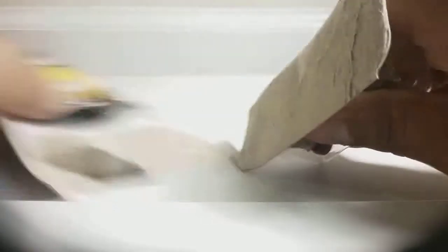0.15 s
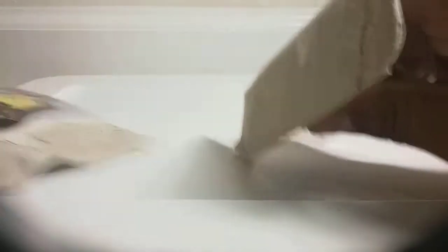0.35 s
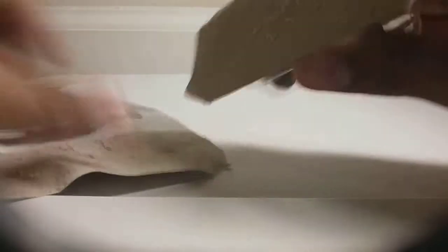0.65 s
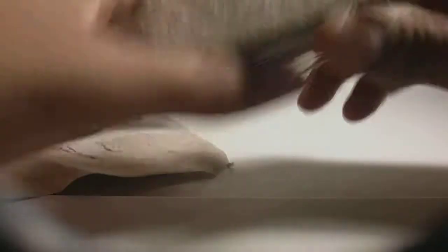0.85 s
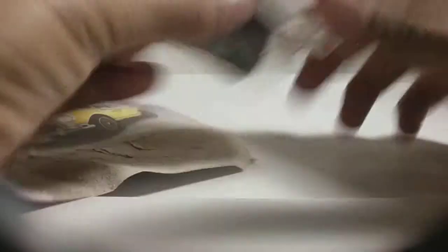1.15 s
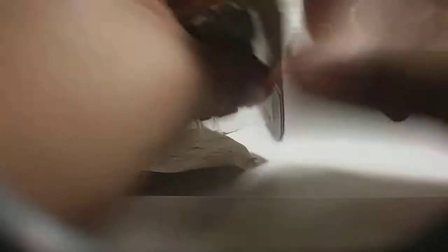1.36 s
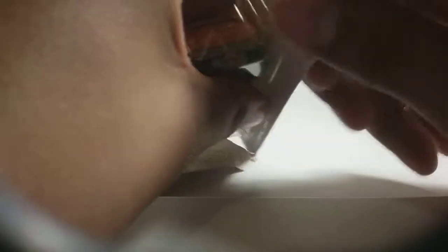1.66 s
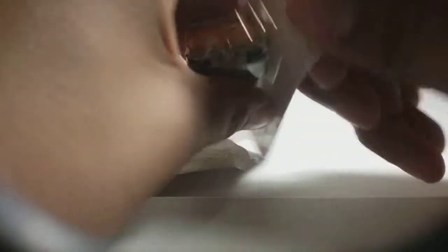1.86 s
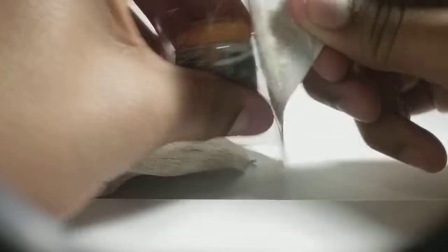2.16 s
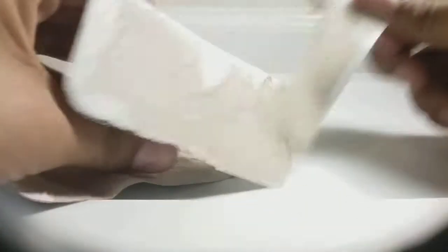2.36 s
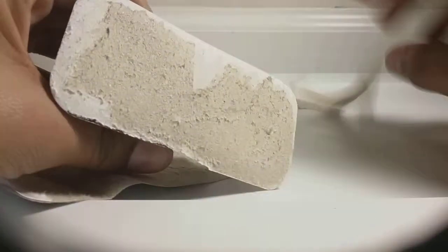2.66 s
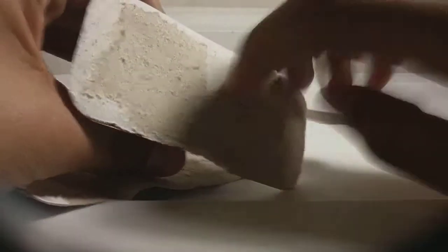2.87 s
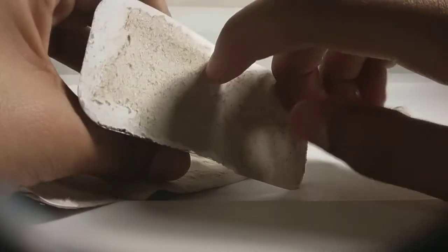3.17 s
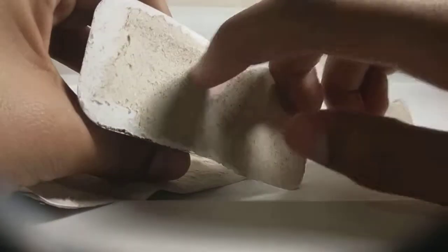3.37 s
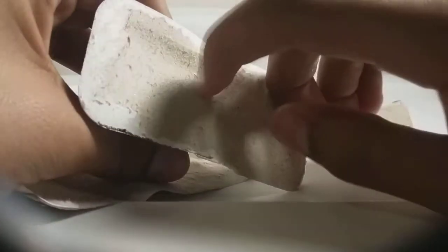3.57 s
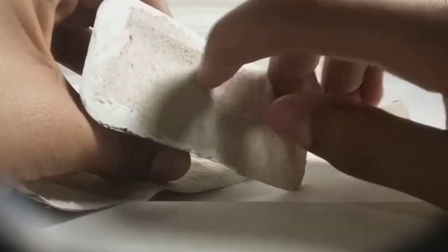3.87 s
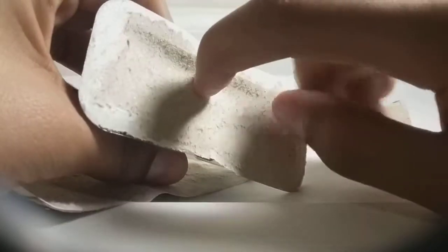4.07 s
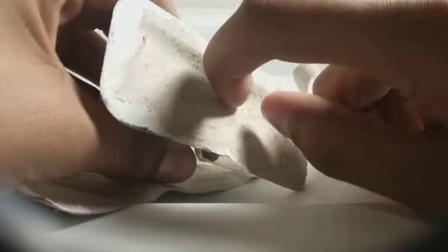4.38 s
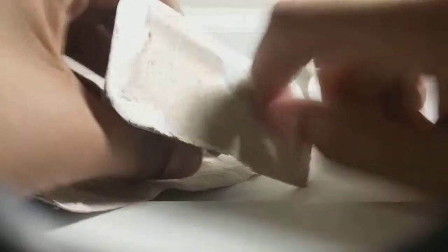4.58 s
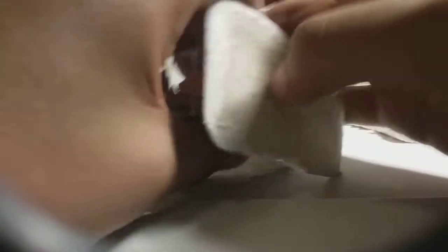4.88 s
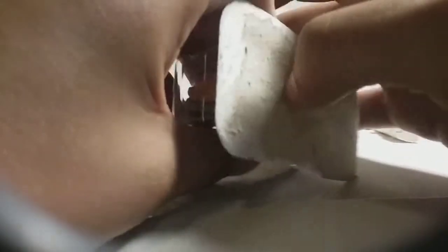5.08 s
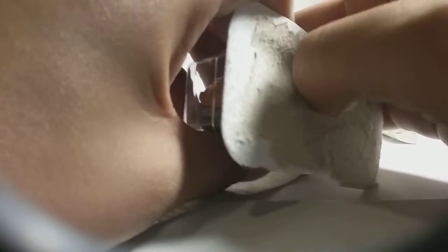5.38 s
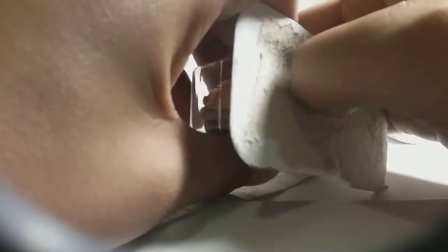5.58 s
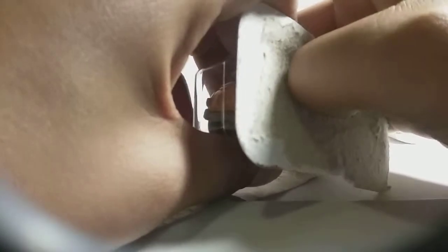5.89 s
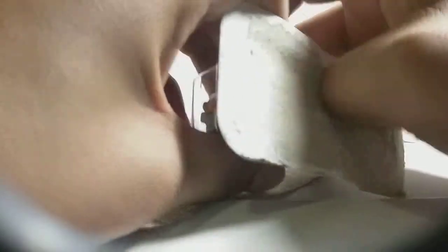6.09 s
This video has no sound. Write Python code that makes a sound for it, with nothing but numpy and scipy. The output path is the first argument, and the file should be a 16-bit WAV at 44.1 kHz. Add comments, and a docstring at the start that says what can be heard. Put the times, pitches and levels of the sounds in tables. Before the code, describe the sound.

A bright, dry cardboard rip starts at once, mixed with plastic crinkle and soft table knocks. It thins to small clicks and a near lull, rips again briefly, then settles into faint handling, scrapes and a few hard snaps. Denser crackles and boxy pops finish it. Close small microphone, short indoor echo, faint hum and hiss.

```python
"""In a quiet, humming room with a wall behind the table, hands tear the card back off a plastic pack.
Random clicks are the breaking fibres of two long tears and of a fingernail's scrapes and pulls.
Short bursts and single pulses are snaps; resonances make the card boom and the plastic bubble crinkle.
Soft pushes make the table thud; one wall echo and a short tail answer, and a small microphone colours
the pack, the knocks and the echo."""
import sys
import numpy as np
from scipy import signal
from scipy.fft import rfft, irfft
from scipy.io import wavfile

SR = 44100
rng = np.random.default_rng(int(sys.argv[2]) if len(sys.argv) > 2 else 0)


def transcribe(signal):
    """Save signal, clipped to [-1, 1], as a 16-bit WAV file at the path in sys.argv[1]."""
    frames = np.atleast_2d(signal).T
    limited = np.clip(frames, -1, 1)
    pcm = np.round(limited * 32767).astype(np.int16)
    wavfile.write(sys.argv[1], SR, pcm)


N = 274743


def from_db(db):
    """Turn decibels into a plain gain."""
    return 10 ** (np.asarray(db) / 20)


def rms_one(x):
    """Scale a sound to an average (rms) strength of 1."""
    return x / np.sqrt(np.mean(x ** 2) + 1e-20)


def gains_in_time(rows):
    """Join the dB levels with straight lines and give gains per sample, all but silent outside the rows."""
    times, *columns = np.transpose(rows)
    now = np.arange(N) / SR
    return np.array([from_db(np.interp(now, times, levels, left=-200, right=-200)) for levels in columns])


def drift(rate_hz):
    """Slow random wandering with spread 1: smoothed noise, worked out every 40 samples."""
    r = np.exp(-2 * np.pi * rate_hz * 40 / SR)
    noise = rng.standard_normal(N // 40 + 2002)
    slow = rms_one(signal.lfilter([1], [1, -2 * r, r * r], noise)[2000:])   # skip the settling start
    return np.interp(np.arange(N) / 40, np.arange(len(slow)), slow)


def resonate(x, hz, width_hz):
    """Ring at one pitch, with gain 1 at the peak; a narrower resonance rings longer."""
    r = np.exp(-np.pi * width_hz / SR)
    top = np.array([1, 0, -1]) * (1 - r * r) / 2
    return signal.lfilter(top, [1, -2 * r * np.cos(2 * np.pi * hz / SR), r * r], x)


def cut(x, hz, kind, order=2):
    """Keep only what lies above ("high") or below ("low") a pitch."""
    return signal.sosfilt(signal.butter(order, hz, kind, fs=SR, output="sos"), x)


# tone of the room's hum and hiss: (frequency [Hz], relative level [dB])
AIR_TONE = [(24, -27.5), (40, -0.5), (60, 9.5), (124, 8.5), (444, -6.5), (965, -10), (1340, -8),
            (4570, -16), (6490, -17), (8550, -24), (14100, -18.5), (16000, -25)]
AIR_DB = -68.5   # level around which it wavers


def air():
    """Hum of the room and hiss of the electronics: tinted noise with a wavering level."""
    hz = np.fft.rfftfreq(N, 1 / SR) + 1
    tone_hz, tone_db = np.transpose(AIR_TONE)
    tint = from_db(np.interp(np.log(hz), np.log(tone_hz), tone_db))
    noise = irfft(rfft(rng.standard_normal(N)) * tint, N)
    level = from_db(AIR_DB + 0.72 * drift(9.1))
    return level * rms_one(cut(noise, 35, "high", order=4))


HUM_HZ, HUM_DB = 119, -76


def hum():
    """A low, wavering hum: noise through two equal narrow resonances."""
    once = resonate(rng.standard_normal(N), HUM_HZ, 25)
    return from_db(HUM_DB) * rms_one(resonate(once, HUM_HZ, 25))


TAIL_DB, TAIL_T60_S, WALL_CUT_HZ = -14, 0.16, 6400   # tail level before the wall dulls it
ECHO_S, ECHO_DB, ECHO_HZ, ECHO_WIDTH_HZ = 0.0135, -11.5, 1100, 200   # echo level before it resonates


def room(x):
    """One hollow echo from the wall behind the table, and a dull noise tail that dies away."""
    t = np.arange(SR // 3) / SR
    tail = rng.standard_normal(len(t)) * from_db(-60 * t / TAIL_T60_S) * np.clip(t / 0.023, 0, 1)
    answer = cut(from_db(TAIL_DB) * tail / np.linalg.norm(tail), WALL_CUT_HZ, "low", order=1)
    click = from_db(ECHO_DB) * (np.arange(len(t)) == round(ECHO_S * SR))
    answer += resonate(click, ECHO_HZ, ECHO_WIDTH_HZ)
    return signal.fftconvolve(x, answer)[:N]


# resonances of the microphone's port: (frequency [Hz], width [Hz], boost [dB])
PORT_RESONANCES = [(6090, 1200, 7.5), (6632, 640, 9)]
DULL_ABOVE_HZ, TOP_DB = 7220, -11


def microphone(x):
    """The small port rings near its own pitches and is dull above; the bass is thin."""
    for hz, width_hz, db in PORT_RESONANCES:
        x = x + (from_db(db) - 1) * resonate(x, hz, width_hz)
    top = from_db(TOP_DB) * cut(x, DULL_ABOVE_HZ, "high", order=4)
    x = cut(x, DULL_ABOVE_HZ, "low", order=4) + top
    return cut(x, 61, "high", order=3)


# knocks of the pack on the table and in the palm: (time [s], relative push level [dB])
KNOCKS = [(0.07, -30), (0.23, -27), (0.914, -46), (1.521, -33), (1.606, -41), (1.641, -43.5), (1.958, -52),
          (1.994, -39), (2.209, -34), (2.285, -28.5), (2.342, -26), (2.451, -33), (2.778, -46),
          (2.829, -39), (2.942, -33.5), (3.013, -41.5), (3.422, -44.5), (3.574, -51), (3.643, -33.5),
          (3.662, -32.5), (3.723, -43), (4.15, -42), (4.299, -27.5), (4.316, -38), (4.354, -37.5),
          (4.399, -45), (4.593, -31.5), (4.612, -27), (4.645, -29), (4.696, -34), (4.892, -47),
          (5.132, -44.5), (5.239, -43), (5.4, -39), (5.459, -36), (5.584, -35.5), (5.627, -34),
          (5.668, -34), (5.732, -34.5), (5.751, -34), (5.984, -33.5), (5.999, -42), (6.104, -29),
          (6.128, -33), (6.175, -30)]
SHAKES_PER_S, TEAR_SHAKE_DB, SCRAPE_SHAKE_DB = 70, -4.5, -11


def knocks():
    """Single pushes, and uneven shakes that follow tears and scrapes, set the table top thudding."""
    pushes = np.full(N, 1e-18)
    for s, db in KNOCKS:
        pushes[round(s * SR)] += from_db(db)
    effort = from_db(TEAR_SHAKE_DB) * tear_effort()[1]
    for s, db, *_, length_s in SCRAPES:
        drag = scrape_shape(length_s)[0]
        effort[round(s * SR):][:len(drag)] += from_db(db + SCRAPE_SHAKE_DB) * drag
    # one shake at a chance moment in each equal slot of time
    count = N // SR * SHAKES_PER_S
    moments = ((np.arange(count) + rng.random(count)) * SR / SHAKES_PER_S).astype(int)
    pushes[moments] += effort[moments] * rng.normal(0, 1, count)
    thud = resonate(pushes, 140, 82) + 0.16 * resonate(pushes, 280, 110)
    return from_db(40) * cut(thud, 450, "low", order=4)


# the pack's changing colour as it is turned about:
# (time [s], sizzle against crackle, before the mix [dB], bubble pitch [Hz])
COLOUR = [(0.0, -8, 3200), (0.45, -5, 4200), (0.9, -11, 3980), (1.06, -27, 4700), (1.14, -5, 4330),
          (1.3, -18.5, 3700), (1.55, -9, 2640), (1.649, -15, 2680), (1.7, 17, 2900), (1.76, -14, 2700),
          (1.96, -13, 2440), (2.1, -3, 4000), (2.46, -10.5, 2700), (2.65, -2.5, 4700), (2.92, -10, 2600),
          (3.1, -9.5, 3400), (3.64, -10.5, 2900), (4.3, -9.5, 3710), (4.6, -9.5, 2750), (4.75, -10, 4000),
          (5.2, -14.5, 2380), (5.45, -17.5, 2600), (5.6, -5, 2900), (5.629, -2, 2900), (5.75, -22, 2860),
          (5.98, -10.5, 3150), (6.085, -7, 3700), (6.11, -9.5, 2670), (6.23, -9, 3400)]


def colour_at(s):
    """Turning the pack changes its sizzle level in dB and its bubble pitch in Hz."""
    times, sizzle_db, bubble_hz = np.transpose(COLOUR)
    return np.interp(s, times, sizzle_db), np.interp(s, times, bubble_hz)


# resonances of card and bubble: (frequency [Hz], width of one pass [Hz], relative level [dB])
# the level serves tears and handling only
CARD = [(180, 45, 1), (308, 44, 6), (463.3, 390, 5.5), (590, 270, 3.5), (750, 170, -5.5), (930, 576, 4),
        (1100, 350, -2.5), (1558, 340, -11.5), (1526, 720, 2.5), (1870, 840, -22), (2459, 330, -3),
        (2900, 830, -5.5), (3718, 580, -5.5), (3860, 1400, -7), (4700, 890, -18.5)]


def card(fine, coarse, direct, rings):
    """Fine clicks are heard directly as crackle and sizzle, coarse ones through the pack's resonances."""
    crackle = cut(cut(direct[0] * fine, 6100, "high"), 6750, "low", order=4)
    sizzle = cut(direct[1] * fine, 11460, "high", order=4)
    out = crackle + sizzle
    for k, (gain, (hz, width_hz, _)) in enumerate(zip(rings, CARD)):
        once = resonate(gain * coarse[k % 2], hz, width_hz)   # neighbours take turns with two click streams
        out += resonate(once, hz, 1.7 * width_hz)
    return out


def near(hz, chance_db):
    """Share of a stroke that each resonance takes: most for those close to the stroke's pitch."""
    card_hz, width_hz, _ = np.transpose(CARD)
    share = from_db(chance_db - 12.3 * np.abs(np.log2(card_hz / hz)))
    # narrow resonances pass less of a click but ring longer
    return share / np.linalg.norm(share) * np.sqrt(250 / width_hz)


def strokes(events, shape, crackle_db, sizzle_db, boom_db, crinkle_db):
    """Each stroke's effort drives crackle, sizzle and resonances; the card rings low, the bubble high."""
    direct = np.full((2, N), 1e-18)
    rings = np.full((len(CARD), N), 1e-18)
    luck_db = rng.normal(0, 2.2, (len(events), len(CARD)))
    for (s, db, boom, boom_hz, crinkle, *length), chance_db in zip(events, luck_db):
        at = max(round(s * SR), 0)
        sizzle, crinkle_hz = colour_at(s)
        effort, push = from_db(db) * shape(*length)[:, :N - at]
        boom_shares = from_db(boom_db + boom) * near(boom_hz, chance_db)
        crinkle_shares = from_db(crinkle_db + crinkle) * near(crinkle_hz, chance_db)
        direct_gains = from_db([crackle_db, sizzle_db + sizzle])
        direct[:, at:at + len(effort)] += np.outer(direct_gains, effort)
        rings[:, at:at + len(push)] += np.outer(boom_shares + crinkle_shares, push)
    return direct, rings


# In all tables below, levels are relative: later mix gains and resonances change them.
# fingers shifting on the pack: (time [s], crackle level [dB], card boom level [dB])
HANDLING = [(0.4, -66, -62.5), (0.56, -54, -59), (0.87, -62.5, -72.5), (1.21, -62, -67.5), (1.36, -72, -80),
            (1.88, -75, -68.5), (2.0, -57.5, -63), (2.64, -62, -77), (3.0, -61, -57.5), (3.19, -80, -88.5),
            (3.47, -82, -80), (3.6, -67.5, -72.5), (4.22, -70, -72.5), (4.6, -79, -72),
            (4.77, -55.5, -56.5), (5.0, -61, -51.5), (5.19, -62, -64), (5.32, -52.5, -55),
            (5.6, -61.5, -63), (5.74, -49, -62), (5.83, -62, -99), (6.03, -78.5, -81), (6.1, -51.5, -54.5),
            (6.23, -47, -36)]


def tears_and_handling():
    """Tearing and shifting fingers drive the pack while a changing grip makes resonances come and go."""
    crackle, boom = gains_in_time(HANDLING) + tear_effort()
    sizzle = crackle * from_db(colour_at(np.arange(N) / SR)[0])
    direct = from_db([[-4], [9]]) * np.array([crackle, sizzle])
    rings = []
    for hz, _, db in CARD:
        # low resonances follow the boom, high ones the crackle
        drive = from_db(5.0) * boom if hz < 2200 else from_db(3.0) * crackle
        rings.append(from_db(db + 2.9 * drift(17)) * drive)
    return direct, np.array(rings)


# two long tears, each a list of (time [s], crackle level [dB], card boom level [dB])
TEARS = [
    [(0.0, -26.5, -31), (0.022, -21.5, -35.5), (0.082, -25.5, -35.5), (0.12, -25, -32), (0.208, -20, -35),
     (0.232, -29, -30.5), (0.278, -21.5, -32), (0.388, -45.5, -50), (0.5, -45, -84)],
    [(2.03, -45.5, -50), (2.09, -55, -72.5), (2.246, -25, -32.5), (2.29, -32, -34), (2.344, -24.5, -28),
     (2.394, -28.5, -33.5), (2.468, -26, -31), (2.49, -42.5, -51), (2.56, -64, -74)],
]


def tear_effort():
    """Crackle and boom effort of both tears, rising and falling as the card gives way."""
    return sum(gains_in_time(tear) for tear in TEARS)


STROKE_MIX = dict(crackle_db=-2, sizzle_db=8.5, boom_db=15.0, crinkle_db=3.0)


def scrape_shape(length_s):
    """A drag builds up over 11 % of its length, holds, and fades; it pushes the card all along."""
    u = np.linspace(0, 1, max(int(length_s * SR), 8))
    effort = np.clip(u / 0.11, 0, 1) ** 2 * np.clip((1 - u) / 0.38, 0, 1)
    return np.tile(effort, (2, 1))


# short scrapes and rips: (time [s], crackle level [dB], card boom against crackle [dB],
# card pitch [Hz], bubble crinkle against crackle [dB], length [s])
SCRAPES = [(0.006, -36.5, 11.5, 1330, 11, 0.13), (0.238, -16, -0.5, 1480, -21, 0.036),
           (0.449, -42, -10, 1000, 5.5, 0.048), (0.458, -66, 12.5, 480, 3, 0.03),
           (0.604, -44, -9.5, 1290, 4, 0.028), (0.78, -43.5, -11.5, 930, 8.5, 0.071),
           (0.901, -41.5, 0.5, 890, 5.5, 0.073), (1.012, -36.5, 4.5, 1110, 9, 0.038),
           (1.13, -47.5, 5.5, 1380, -17, 0.028), (1.245, -55.5, -22, 1030, -14, 0.046),
           (1.57, -56.5, 13.5, 900, 3, 0.089), (1.685, -65.5, 0, 511, -9, 0.065),
           (1.737, -70.5, 21, 923, -4.5, 0.052), (1.955, -40.5, 1, 930, 20.5, 0.036),
           (2.251, -27, 6, 1100, 2, 0.045), (2.27, -26, 5.5, 1250, 12.5, 0.036),
           (2.292, -30.5, 9, 750, 13.5, 0.055), (2.439, -43.5, 13, 1240, 1, 0.038),
           (2.606, -48.5, -16.5, 650, 1, 0.064), (2.655, -66, -27, 780, -5.5, 0.044),
           (3.006, -57, 7, 540, 8, 0.048), (3.077, -37.5, -1.5, 1064, -6, 0.054),
           (3.158, -53.5, 4, 1340, -18, 0.054), (3.422, -37, -2.5, 1315, 0.5, 0.022),
           (3.444, -45, 1, 1106, 2.5, 0.032), (3.523, -62.5, 0, 1180, 13, 0.055),
           (3.638, -24, 7.5, 1890, -11.5, 0.008), (3.661, -25, 1.5, 1820, -21, 0.012),
           (3.667, -37.5, 6.5, 1150, 13, 0.054), (3.891, -40.5, 8.5, 1014, 12, 0.08),
           (4.078, -59.5, 4, 1890, -20.5, 0.082), (4.085, -77, 7.5, 660, -2.5, 0.024),
           (4.145, -40, 7.5, 905, 4.5, 0.015), (4.3, -18, -4, 1950, -20.5, 0.011),
           (4.314, -32.5, -5.5, 1800, -8, 0.045), (4.586, -34.5, -2.5, 834, -4, 0.032),
           (4.602, -30.5, 11.5, 1900, -23, 0.023), (4.614, -37, 10, 1250, -17, 0.055),
           (4.671, -46.5, 13, 950, -7, 0.063), (4.848, -55, -10, 853, 15, 0.13),
           (5.116, -62, 19.5, 1180, -17, 0.035), (5.203, -50, 16, 1280, 10, 0.053),
           (5.241, -43.5, 10.5, 1100, 0, 0.054), (5.44, -45, 8.5, 1370, -14, 0.042),
           (5.72, -49.5, 11, 870, 12, 0.021), (5.978, -33, 1, 854, 0.5, 0.015),
           (6.097, -28, 8, 1600, 13.5, 0.021)]


def scrapes():
    """A fingernail drags and picks at the card, driving clicks and resonances."""
    return strokes(SCRAPES, scrape_shape, **STROKE_MIX)


SWELL_SHARE, SWELL_POWER = 0.66, 2   # share of the pull spent swelling; how steeply it swells


def pull_shape(length_s):
    """The effort swells over most of the pull and lets go."""
    u = np.linspace(0, 1, int(length_s * SR))
    effort = np.minimum((u / SWELL_SHARE) ** SWELL_POWER, (1 - u) / (1 - SWELL_SHARE))
    return np.tile(effort, (2, 1))


# pulls that swell until the card gives way: (time [s], crackle level [dB],
# card boom against crackle [dB], card pitch [Hz], bubble crinkle against crackle [dB], length [s])
PULLS = [(0.055, -24.5, 8.5, 890, -15, 0.041), (0.935, -27, -3, 970, -11, 0.063),
         (1.895, -52.5, 18, 676, 0, 0.092), (2.915, -54.5, 21.5, 760, -10, 0.052),
         (4.67, -38.5, -1, 1330, 20, 0.055), (5.13, -46.5, 14.5, 870, 7, 0.089)]


def pulls():
    """Swelling pulls drive the same clicks and resonances as the scrapes."""
    return strokes(PULLS, pull_shape, **STROKE_MIX)


def fibres(per_s, uneven_db, clumps):
    """Breaking fibres: random clicks of uneven size, stronger in clumps; rms 1."""
    sizes = from_db(uneven_db * np.minimum(rng.exponential(1, N), 5)) * rng.choice([-1, 1], N)
    return rms_one(sizes * (rng.random(N) < per_s / SR) * clumps + 1e-9)


def tearing():
    """Tears, handling, scrapes and pulls break fibres one by one."""
    parts = [tears_and_handling(), scrapes(), pulls()]
    direct = sum(part[0] for part in parts)
    rings = sum(part[1] for part in parts)
    clumps = from_db(1.8 * drift(45) + 2.2 * drift(180))
    fine = fibres(14000, 2.5, clumps)
    coarse = [fibres(2000, 2.6, clumps), fibres(2000, 2.6, clumps)]
    return card(fine, coarse, direct, rings)


# runs of small snaps: (start [s], end [s], crack level [dB], card boom against crack [dB],
# card pitch [Hz], bubble crinkle against crack [dB])
PATTER = [(2.042, 2.14, -57, -12, 800, -8), (2.796, 2.87, -63, 10, 750, -3),
          (2.871, 3.0, -63.5, 14, 670, 13), (5.121, 5.24, -49, 13, 930, -17),
          (5.335, 5.39, -41.5, -1.5, 900, -5)]
PATTER_PER_S, PATTER_SPREAD_DB = 80, 3.5


def patter():
    """Rows of small snaps, unevenly spaced and unevenly strong."""
    snaps = []
    for start, end, db, *ring in PATTER:
        for s in np.arange(start, end, 1 / PATTER_PER_S):
            moment = s + rng.random() / PATTER_PER_S
            snaps.append((moment, db + rng.normal(0, PATTER_SPREAD_DB), *ring))
    return snaps


def snap_shape():
    """A burst rises and dies within milliseconds; its push on the card has one early jolt."""
    ms = np.arange(SR // 40) * 1000 / SR
    burst = (1 - np.exp(-ms / 0.99)) * np.exp(-ms / 2.34)
    push = 0.76 * burst
    push[30] += 4.0   # the jolt, 0.7 ms in
    return np.array([burst, push])


POP_DB, POP_LATE_S = 3, 0.001418   # pulse level against the boom; delay of its peak


def pops(events):
    """The card buckles: one inward pulse of air, about as long as a cycle of the card's pitch."""
    out = np.zeros(N + SR // 100)
    t = np.arange(SR // 200) / SR
    for s, db, boom, hz, _ in events:
        a = (np.pi * hz * (t - POP_LATE_S)) ** 2
        pulse = (1 - 2 * a) * np.exp(-a)
        out[round(s * SR):][:len(t)] -= from_db(db + boom + POP_DB) * pulse
    return out[:N]


# snaps of card and bubble: (time [s], crack level [dB], card boom against crack [dB],
# card pitch [Hz], bubble crinkle against crack [dB])
SNAPS = [(0.077, -17, 4, 1050, 10), (0.0943, -18, -2.5, 474, 1), (0.2187, -19.5, 9, 1460, 18),
         (0.2335, -41, 18, 1440, -2), (0.2346, -20, 8.5, 407, 17.5), (0.2625, -21, -12, 1440, -6),
         (0.3985, -46.5, 4.5, 750, 21), (0.5213, -45, -11, 970, 8), (0.5445, -42, -9, 750, -50),
         (0.6716, -37.5, 2.5, 1010, 11), (0.7099, -38, 3, 1050, 7), (0.7989, -39, -18, 1770, -5),
         (0.9185, -31.5, -25, 766, -21), (0.9756, -28, -4, 1160, 10), (1.0189, -18.5, -25, 1220, -12),
         (1.0301, -34, 7, 1170, -21), (1.0685, -32, -7.5, 1410, 9), (1.1412, -49, 9, 1296, -5),
         (1.3029, -30, -3.5, 1173, 6), (1.3666, -47.5, 1, 1407, -1), (1.3812, -49.5, -12, 1126, -16),
         (1.5196, -43.5, 11.5, 810, 8), (1.5239, -42.5, 4, 666, 6), (1.6054, -42.5, 1.5, 634, 10),
         (1.7602, -51.5, 5, 1060, 14), (1.8478, -60, 6.5, 530, -1), (1.9601, -25.5, 3.5, 930, 18.5),
         (1.9701, -30, 5.5, 1040, 2), (2.0698, -39, -27, 770, -22), (2.1449, -28, -10, 1600, -11.5),
         (2.1715, -28, -8, 1680, 6), (2.2102, -34.5, 9, 625, -11), (2.2197, -25, -23, 930, -12),
         (2.2782, -11.5, -5.5, 1040, -5), (2.3462, -31, 19.5, 684, -10), (2.3616, -24.5, 6.5, 664, 8),
         (2.4634, -25, 3, 1330, 14), (2.4936, -44, 17, 1030, 21.5), (2.6163, -42.5, -11, 588, 8),
         (2.6817, -42.5, -15, 535, 16.5), (2.6998, -34, -15.5, 994, -5), (2.7831, -48.5, -1, 790, 2),
         (2.8285, -61, 20.5, 590, 3), (2.9047, -60.5, 20.5, 690, 22), (2.9414, -53, 19.5, 1390, -8),
         (2.9503, -58.5, 27.5, 795, -3), (3.0171, -56, 25.5, 530, -5), (3.0812, -39.5, 4, 1100, -1),
         (3.0923, -23, -14, 1220, -2), (3.1138, -38, 1.5, 1058, -18.5), (3.7058, -30.5, -9.5, 1036, -1),
         (3.7146, -33, -1, 590, 3), (3.9067, -27.5, -10, 1126, -13), (4.1757, -45, 0.5, 384, 3.5),
         (4.3025, -32.5, 13.5, 633, -1.5), (4.3456, -24.5, -8, 727, -3), (4.6115, -28.5, 12.5, 1910, -6),
         (4.6464, -45, 17.5, 1100, -22), (4.692, -44, 11.5, 515, 2), (4.7155, -52, 18, 510, 0),
         (4.712, -22, -1, 1600, -5), (4.7412, -39, -4, 800, -8.5), (4.8943, -42, 13.5, 850, -18),
         (4.9903, -64, 20, 1026, 10), (5.0114, -54.5, 18.5, 1260, -13), (5.1879, -37.5, 0, 700, 15),
         (5.2095, -39.5, 8, 1130, -4), (5.2448, -48.5, 24.5, 1000, 5), (5.2687, -40.5, 8.5, 1170, 22),
         (5.2794, -34.5, 10.5, 1310, 13), (5.3093, -35.5, 10.5, 1170, 9), (5.325, -36, 9, 1210, 16),
         (5.4029, -25.5, 3.5, 1190, 2), (5.4519, -23.5, 3, 1410, 2), (5.4643, -20, -1, 1190, 5),
         (5.5544, -49.5, 11, 1070, -11), (5.5673, -44, -2, 663, -19), (5.5866, -21.5, -4.5, 1360, 16.5),
         (5.6023, -20, 3, 1690, 10), (5.6269, -20, 5, 940, 11), (5.667, -22, 14, 1240, -25),
         (5.7546, -14, -2.5, 1307, -5), (6.0817, -35, 3.5, 1000, 19), (6.103, -23, 16, 1530, 3),
         (6.1209, -15, 5.5, 865, 6), (6.1286, -20.5, 3, 900, 4), (6.1354, -18, 3.5, 790, 6),
         (6.1765, -21, 15.5, 910, 11), (6.1904, -40, 23, 1110, -1)]


def snapping():
    """Many fibres break at once: dense noise bursts shake the pack and the card pops."""
    at_once = rng.choice([-1., 1.], (2, N))
    snaps = [*SNAPS, *patter()]
    direct, rings = strokes(snaps, snap_shape, crackle_db=5.6, sizzle_db=14, boom_db=18, crinkle_db=8.7)
    # neighbouring resonances swing against each other
    return pops(snaps) + card(at_once[0], [at_once[1], -at_once[1]], direct, rings)


def pack():
    """The whole pack: fibres breaking one by one, and snaps that break many at once."""
    return tearing() + snapping()


def scene():
    """Pack, knocks and their echo pass through the microphone port; steady air and hum are added."""
    dry = pack() + knocks()
    return (microphone(dry + room(dry)) + air() + hum())[None]


def record(dry):
    """Cut the very top steeply: 60 dB down from 16200 Hz."""
    return signal.sosfilt(signal.cheby2(16, 60, 16200, fs=SR, output="sos"), dry)


dry = scene()
out = record(dry)
transcribe(out)
```